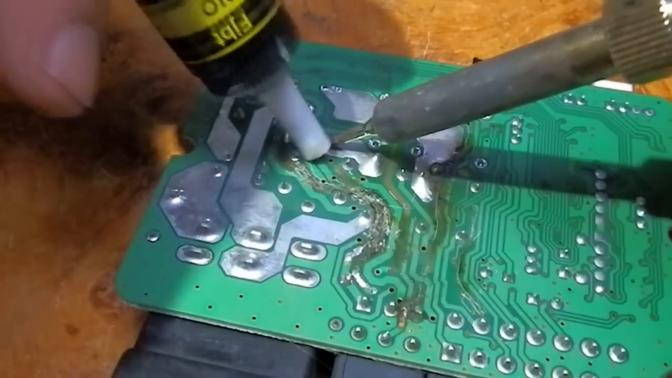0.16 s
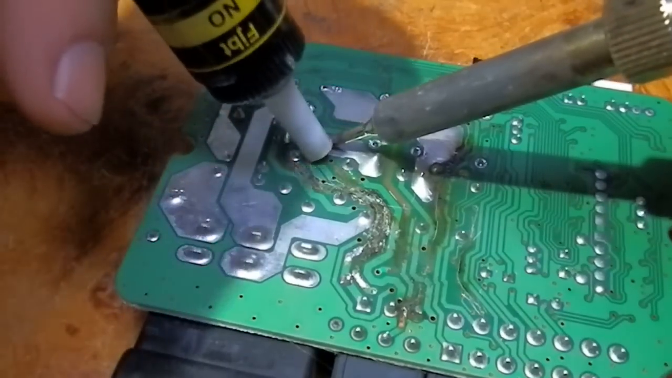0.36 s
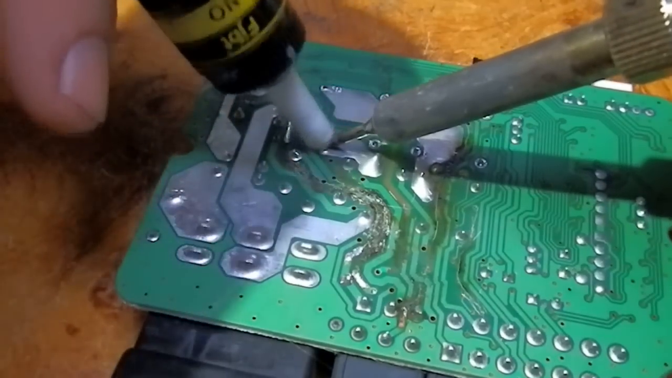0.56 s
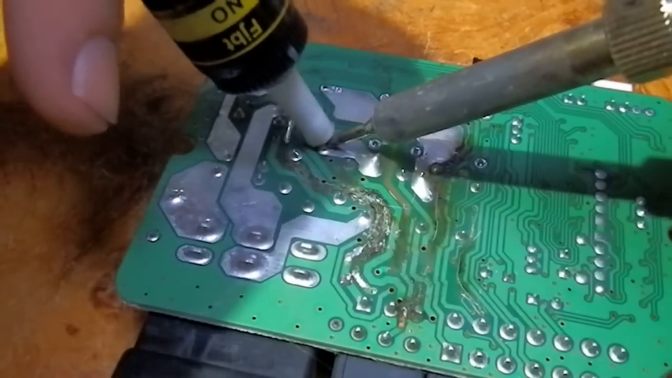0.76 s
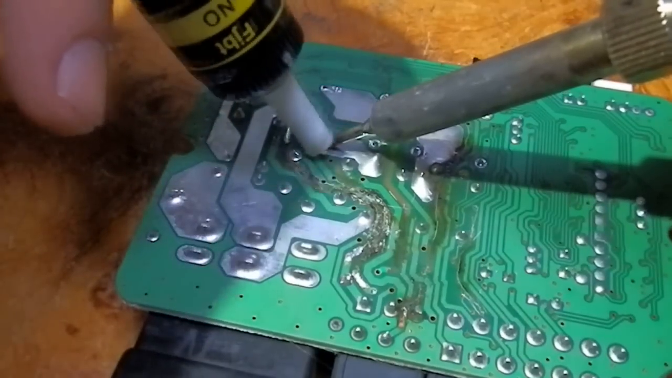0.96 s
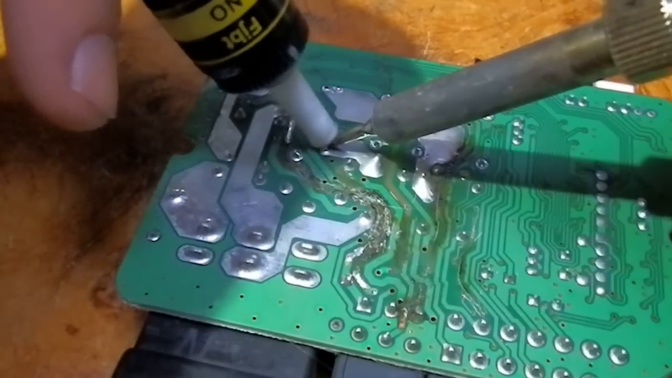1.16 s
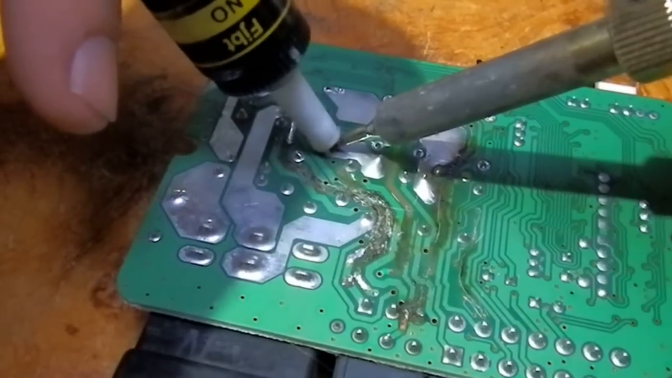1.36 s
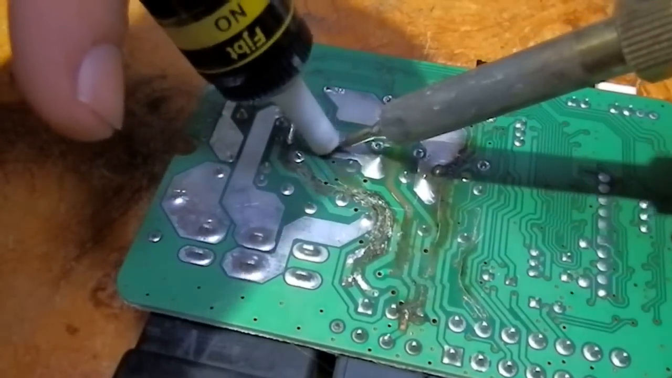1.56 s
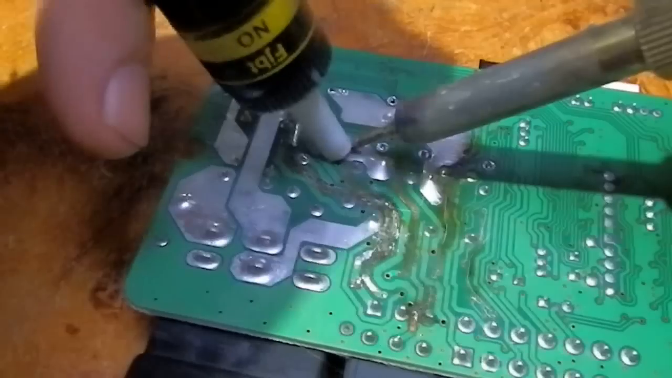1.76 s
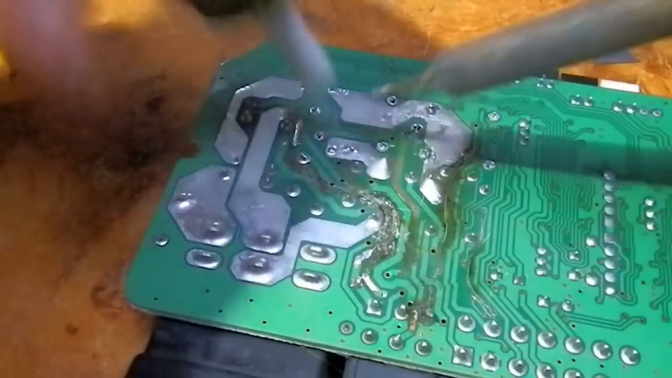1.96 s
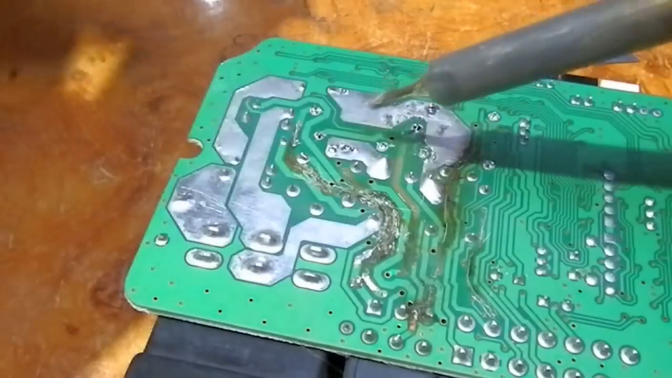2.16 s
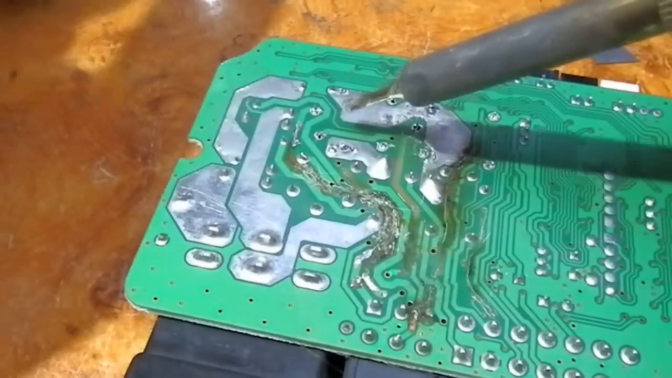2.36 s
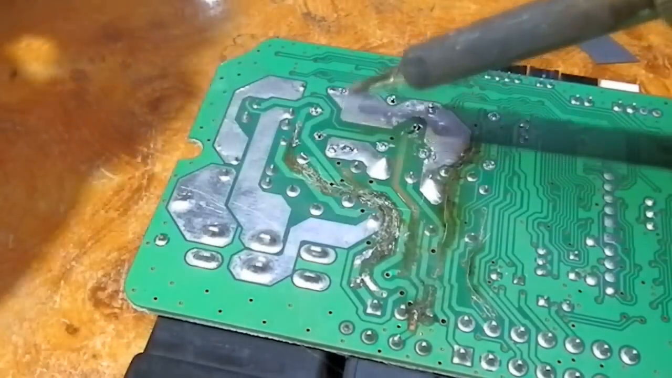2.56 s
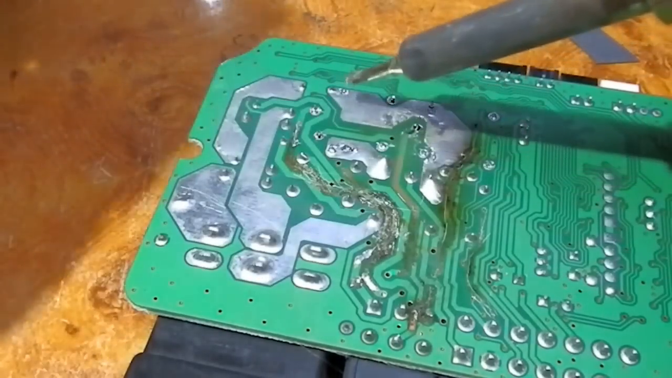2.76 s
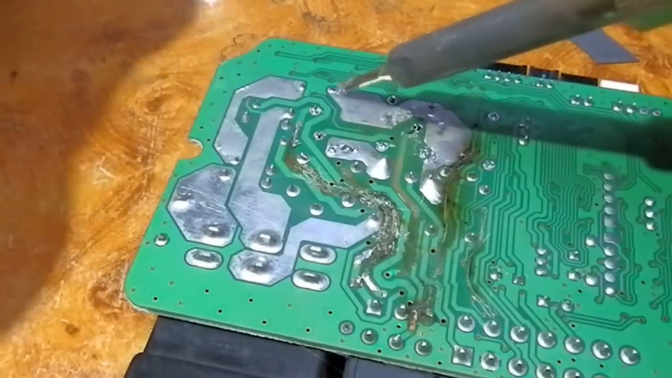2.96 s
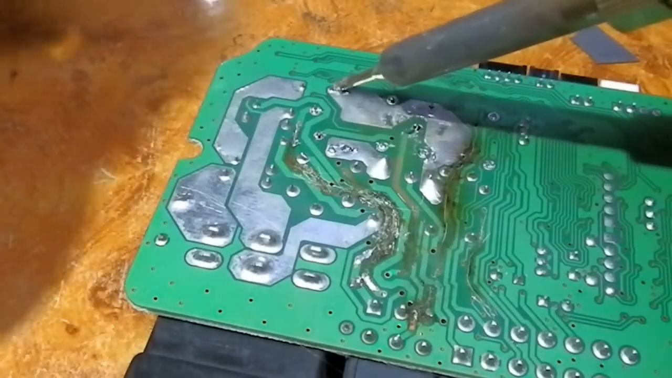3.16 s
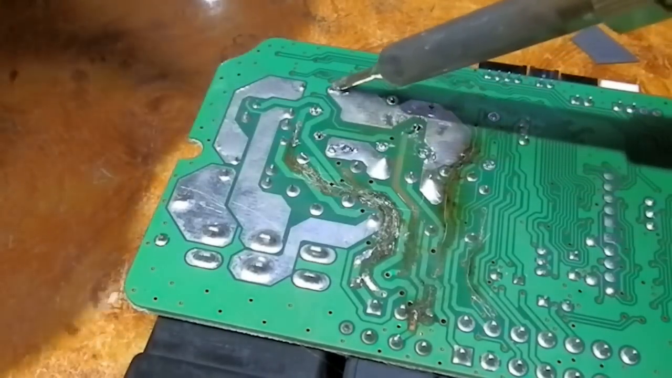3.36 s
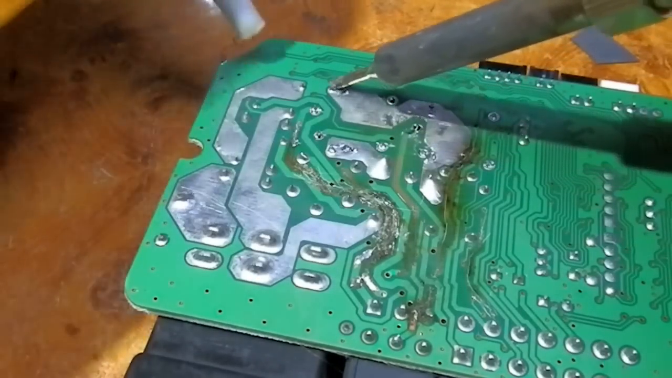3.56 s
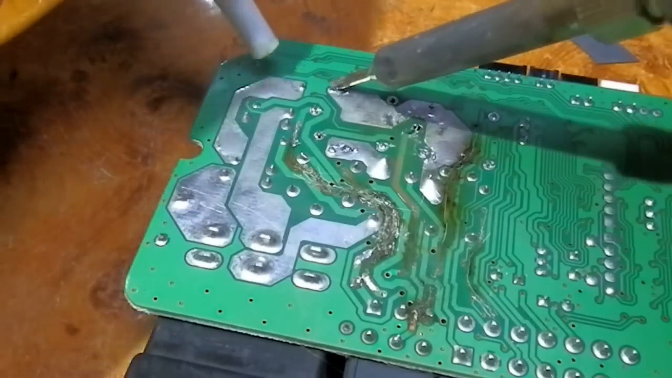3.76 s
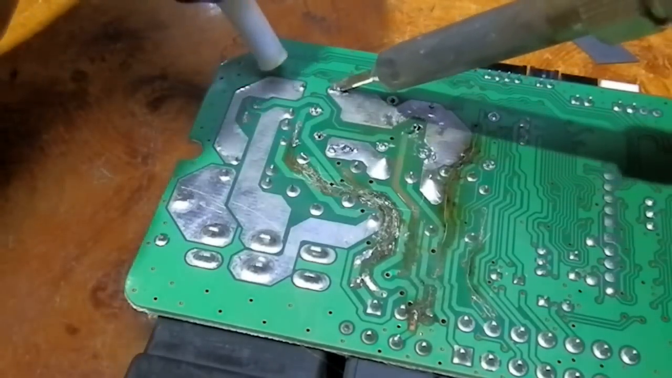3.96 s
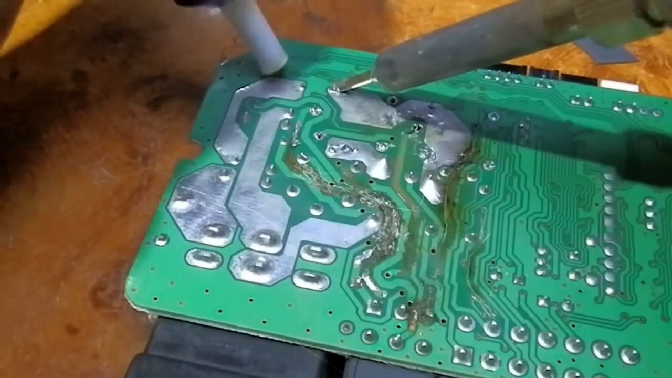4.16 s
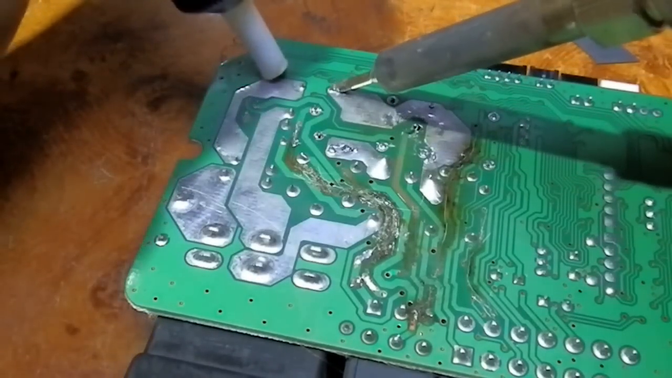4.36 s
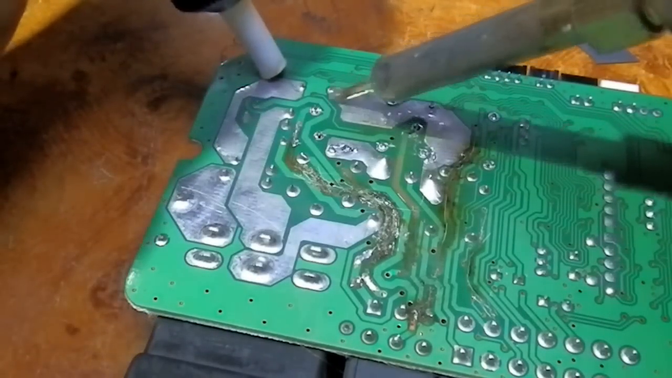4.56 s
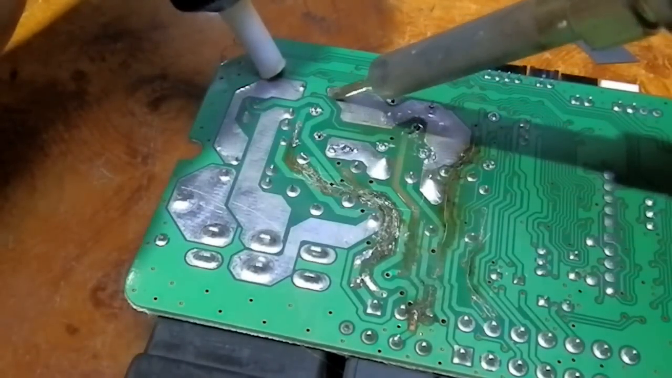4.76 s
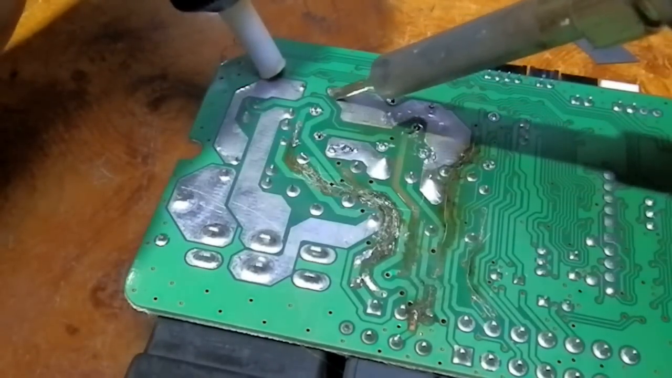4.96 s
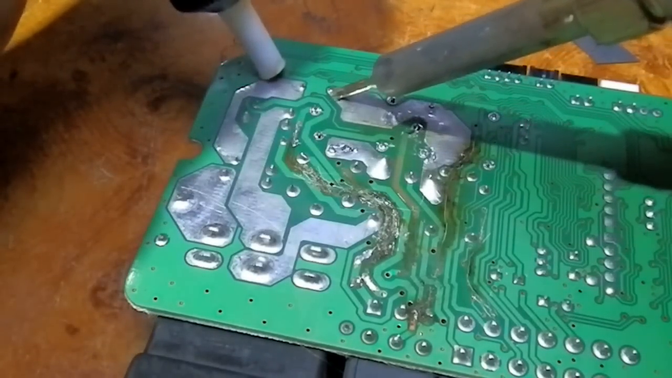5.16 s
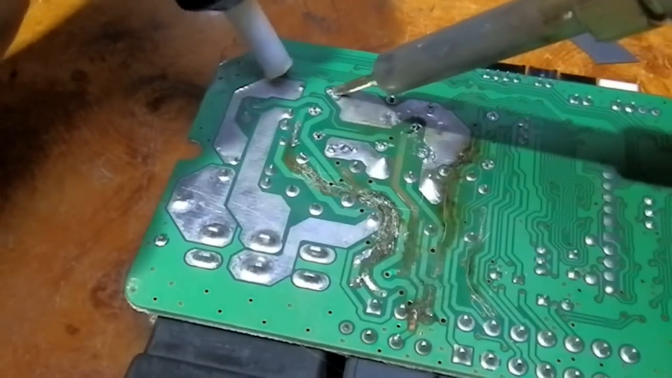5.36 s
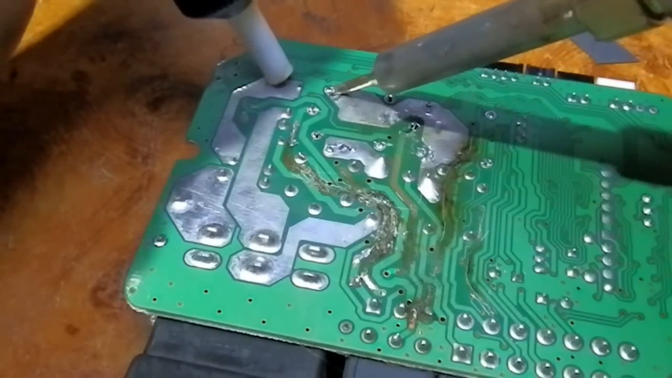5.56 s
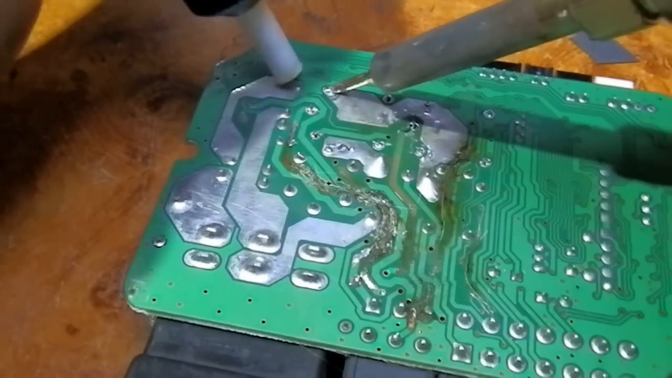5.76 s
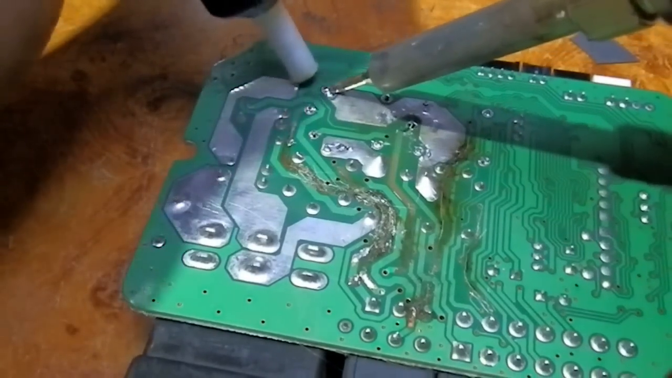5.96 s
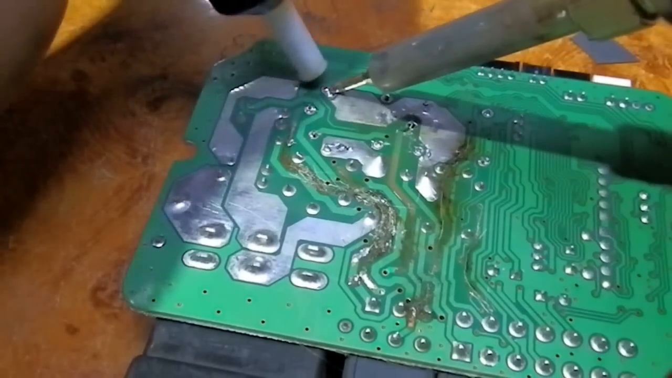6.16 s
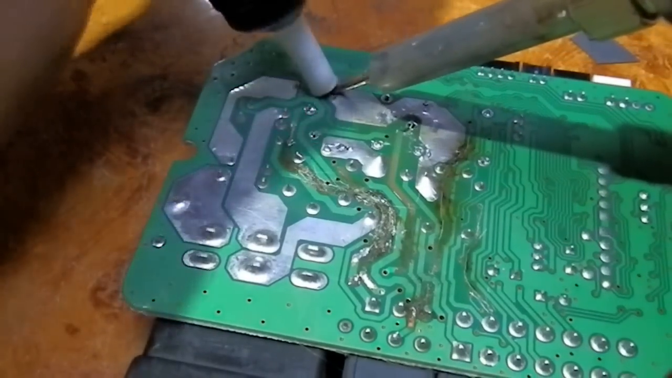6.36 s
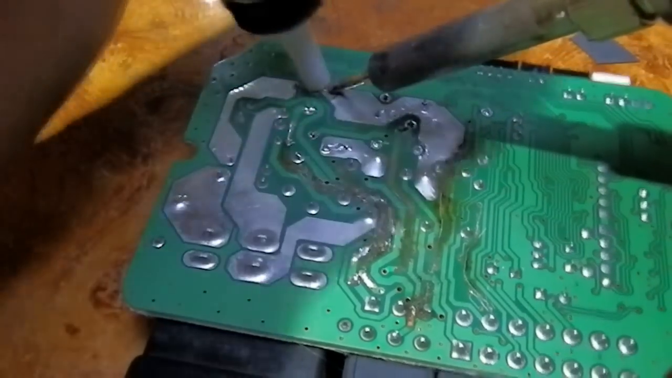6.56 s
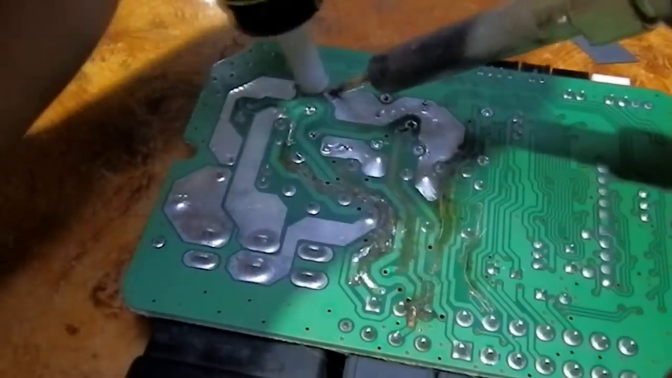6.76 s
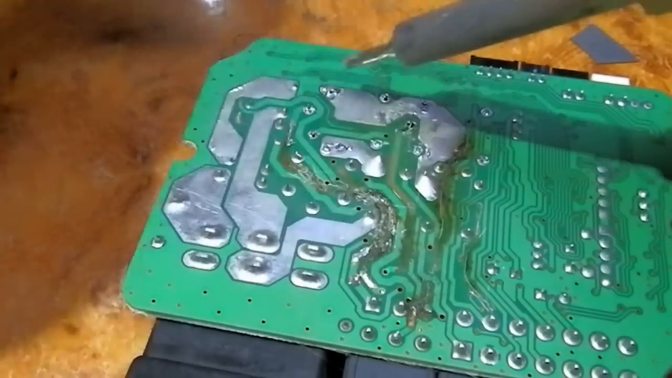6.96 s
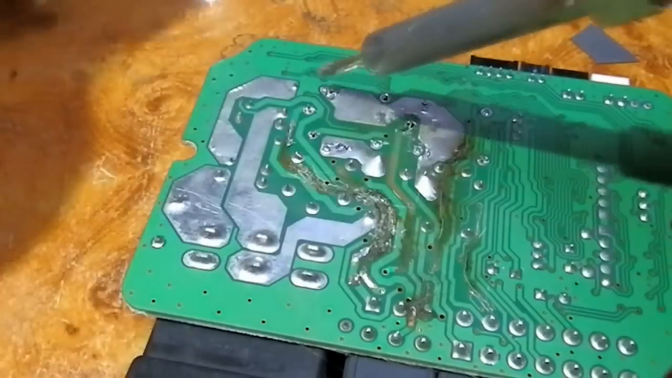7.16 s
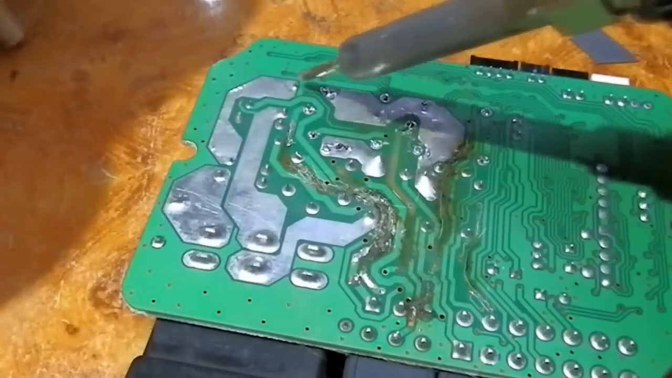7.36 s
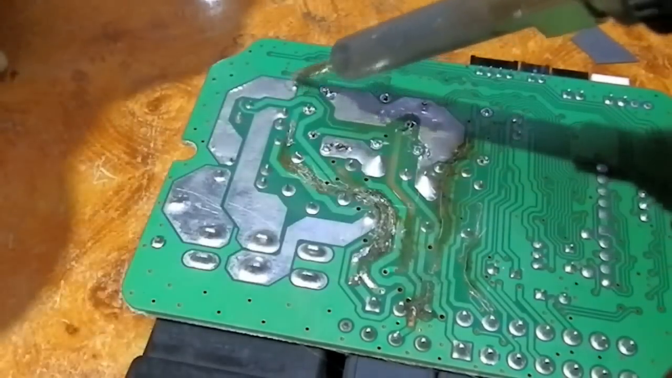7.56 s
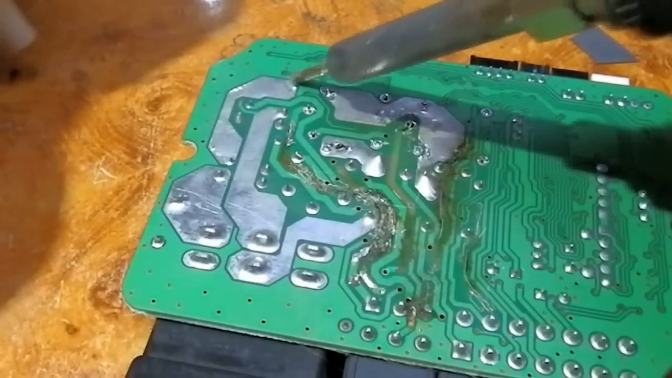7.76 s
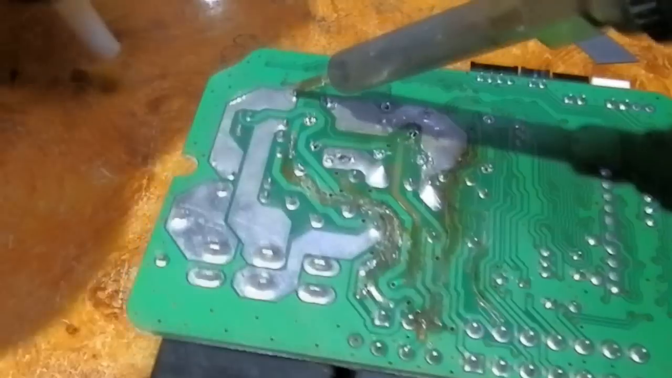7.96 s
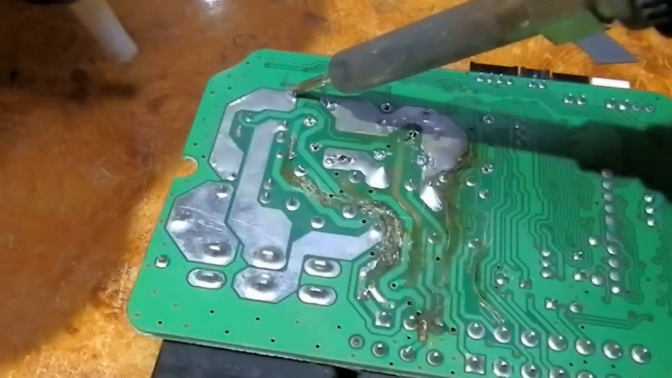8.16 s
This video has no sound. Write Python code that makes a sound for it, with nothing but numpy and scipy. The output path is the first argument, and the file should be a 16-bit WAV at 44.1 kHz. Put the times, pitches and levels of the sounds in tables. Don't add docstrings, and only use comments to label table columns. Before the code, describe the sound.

At a workbench, close to a small microphone, light taps touch a circuit board over fan hum and thin electronic whine. A spring-loaded pump fires with a very loud plastic crack and rush of air; a second later it scrapes, latches and clacks back with a faint spring ring. After a quiet gap the cycle repeats. Background sound drops after each snap and swells back.

```python
import sys
import numpy as np
from scipy import signal
from scipy.fft import rfft, irfft, next_fast_len
from scipy.io import wavfile
from scipy.ndimage import uniform_filter1d, map_coordinates

SR = 44100
rng = np.random.default_rng(int(sys.argv[2]) if len(sys.argv) > 2 else 0)


def unload_audio(sound):
    columns = np.transpose(np.atleast_2d(sound))
    steps = np.round(np.clip(columns, -1, 1) * 32767)
    wavfile.write(sys.argv[1], SR, steps.astype(np.int16))


def attenuation_scalar(level_db):
    decades = np.asarray(level_db, float) / 20
    return 10 ** decades


N = 362061


def along(points, hz):
    f, v = np.transpose(points)
    return np.interp(np.log(hz + 1), np.log(f + 1), v)


def unit(x):
    return x / np.sqrt(np.mean(x ** 2) + 1e-20)


def filtered(x, response):
    m = next_fast_len(len(x) + 4096)
    return irfft(rfft(x, m) * response(np.fft.rfftfreq(m, 1 / SR)), m)[:len(x)]


def peak(f, hz, width_hz):
    return 1j * f * width_hz / (hz * hz - f * f + 1j * f * width_hz)


def modes(table):
    return lambda f: sum((-1) ** k * attenuation_scalar(db) * peak(f, hz, w) for k, (hz, w, db) in enumerate(table))


def noise(spectrum, size):
    return unit(filtered(rng.standard_normal(size), lambda f: attenuation_scalar(along(spectrum, f))))


def wobble(rate):
    return map_coordinates(rng.standard_normal(int(N * rate / SR) + 4), [np.arange(N) * rate / SR])


def add(track, s, sound):
    part = track[round(s * SR):][:len(sound)]
    part += sound[:len(part)]


# frequency in Hz, level in dB rms.
HUM_LINES = [(118.4, -55), (150.7, -41.5), (199.2, -49), (220.7, -50), (274.5, -40), (425.3, -56.5),
             (602.9, -52.5), (1104, -58), (1701, -61.5)]
# centre in Hz, width in Hz, level in dB rms.
WHINES = [(4183, 80, -71), (4550, 170, -64), (5330, 200, -64), (7200, 300, -58), (8420, 100, -69)]
# frequency in Hz, level in dB rms.
SCREEN_LINES = [(15734.5, -59), (15747.2, -63)]
# frequency in Hz, level in dB per Hz.
ROOM_AIR = [(15, -39), (40, -9.5), (120, -12), (300, -6.5), (450, -14), (620, -9.5), (1000, -17),
            (1500, -20.5), (3000, -27), (6000, -32), (7300, -29.5), (8500, -33), (12000, -41.5),
            (16500, -43.5)]


def workshop():
    t = np.arange(N) / SR

    def line(hz, db):
        return attenuation_scalar(db + 3.5) * np.sin(2 * np.pi * (hz * t + rng.random()))

    def whistle(hz, width_hz, db):
        hiss = filtered(rng.standard_normal(N), lambda f: peak(f, hz, width_hz) ** 2)
        return attenuation_scalar(db) * unit(hiss)

    hum = sum(line(hz, db + 0.81 * wobble(6)) for hz, db in HUM_LINES)
    whine = sum(whistle(*row) for row in WHINES)
    screen = sum(line(hz, db + 1.0 * wobble(12)) for hz, db in SCREEN_LINES)
    air = attenuation_scalar(-37.5 + 0.46 * wobble(5)) * noise(ROOM_AIR, N)
    return hum + whine + screen + air


# time in seconds, gain it falls to in dB.
GAIN_DUCKS = [
    (1.695, -29),
    (2.82, -26),
    (3.015, -23.5),
    (6.55, -33),
    (7.525, -23.5),
    (7.685, -21.5),
]
DUCK_S, RECOVER_DB_PER_S = .03, 17.5


def camera_gain():
    gain_db, t = np.zeros(N), np.arange(N) / SR
    for s, low_db in GAIN_DUCKS:
        k = round(s * SR)
        since = t[k:] - s
        fall = np.exp(-since / DUCK_S)
        gain_db[k:] = np.minimum(0, low_db + (gain_db[k] - low_db) * fall + RECOVER_DB_PER_S * since)
    return gain_db


TREBLE_HZ, TREBLE_DUCK = 1500, 1.035


def ducked_room():
    room, gain_db = workshop(), camera_gain()
    bass = filtered(room, lambda f: 1 / (1 + (f / TREBLE_HZ) ** 2))
    return attenuation_scalar(gain_db) * bass + attenuation_scalar(TREBLE_DUCK * gain_db) * (room - bass)


# time in seconds, strength in dB.
COCK_EVENTS = [
    (2.8072, 0),
    (7.4935, -1.1),
]
STOP_EVENTS = [
    (3.019, -1),
    (7.688, 1.2),
]
# start and length in seconds, level in dB, centre in Hz.
WIDE_SIZZLES = [(0.466, .03, -41, 7340), (1.11, .02, -44.5, 7420), (2.167, 0.036, -52.5, 7240),
                (2.483, 0.097, -55.5, 9030), (3.136, .021, -65.5, 11020), (4.54, .05, -45.5, 11260),
                (5.203, 0.043, -43, 10840), (5.527, .063, -51.5, 10920), (6.279, 0.013, -30, 420),
                (6.283, 0.045, -46, 7840), (6.765, .035, -68, 7430), (7.1, 0.18, -75.5, 9480),
                (7.77, 0.083, -59.5, 5050), (7.931, 0.047, -66.5, 10000)]
# start and length in seconds, level in dB, centre in Hz.
FLUX_CHIRPS = [
    (2.488, 0.062, -55, 6400),
    (3.079, .025, -58, 4820),
    (4.546, .03, -49, 6820),
    (4.61, .03, -60, 15700),
]
# delay and length in seconds, level in dB, centre in Hz, width in Hz.
LATCH_AIR = [
    (.001, 0.021, -26.5, 7200, 7000),
    (.036, .032, -36, 5890, 7900),
    (.037, .06, -47.5, 3400, 1200),
]
STOP_AIR = [
    (.006, .085, -53.5, 7930, 9010),
]


def sizzles():
    rows = [(*row, row[-1] * 0.42) for row in WIDE_SIZZLES]
    rows += [(*row, row[-1] * 0.06) for row in FLUX_CHIRPS]
    for events, puffs in ((COCK_EVENTS, LATCH_AIR), (STOP_EVENTS, STOP_AIR)):
        for s, more_db in events:
            rows += [(s + delay, length, db + more_db, *band) for delay, length, db, *band in puffs]
    out = np.zeros(N)
    for s, length, db, hz, width_hz in rows:
        u = np.linspace(0, 1, round(length * SR))
        hiss = filtered(rng.standard_normal(SR // 4), lambda f: peak(f, hz, width_hz) ** 2)
        hiss = unit(hiss)[999:]
        add(out, s, attenuation_scalar(db) * np.sin(np.pi * u ** 0.39) * hiss[:len(u)])
    return out


# start and end in seconds, start and end in Hz, level in dB.
SINGING = [
    (2.757, 2.797, 5600, 6350, -32),
    (4.1, 4.2, 3400, 3520, -53),
    (4.2, 4.3, 3050, 2800, -54),
]


def squeak():
    out = np.zeros(N)
    for start, end, start_hz, end_hz, db in SINGING:
        u = np.linspace(0, 1, round((end - start) * SR))
        hz = start_hz + (end_hz - start_hz) * u + 45 * wobble(120)[:len(u)]
        swell = np.sqrt(np.abs(np.sin(np.pi * u)))
        add(out, start, attenuation_scalar(db) * swell * np.sin(2 * np.pi * np.cumsum(hz) / SR))
    return out


# time in seconds, level in dB.
PLUNGER_SLIDES = [
    [(2.66, -71.5), (2.718, -48), (2.76, -36.5), (2.795, -35)],
    [(7.37, -69), (7.418, -46.5), (7.462, -48.5), (7.478, -41.5)],
]
# frequency in Hz, level in dB per Hz.
SEAL_RUB = [(590, -45.5), (1000, -16.5), (1550, -17), (2670, -10), (4100, -17), (5850, -4.5),
            (15600, -24.5), (16200, -21.5), (17000, -91)]


def slides():
    t = np.arange(N) / SR
    level = 0
    for rows in PLUNGER_SLIDES:
        last_s, last_db = rows[-1]
        points = np.transpose(rows + [(last_s + 0.029, last_db - 5)])
        level = level + attenuation_scalar(np.interp(t, *points, left=-120, right=-120))
    return level * unit(attenuation_scalar(2 * wobble(300)) * noise(SEAL_RUB, N))


# frequency in Hz, level in dB, t60 in seconds.
RECOIL = [(407, 0.5, .02), (159, -10.5, 0.054)]


def strokes(rows, spectrum):
    out, t = np.zeros(N), np.arange(SR // 10) / SR
    for start, end, start_db, end_db, thump_db in rows:
        flight = end - start
        level_db = np.interp(t, [0, flight, flight + 0.0048, end + 0.035 - start],
                             [start_db, end_db, end_db - 19.5, end_db - 53.5])
        chatter = attenuation_scalar(5.8 * unit(uniform_filter1d(rng.standard_normal(len(t)), 40)))
        rush = unit(chatter * noise(spectrum, len(t)))
        add(out, start, attenuation_scalar(level_db) * np.clip(t / .001, 0, 1) * rush)
        thump = sum(attenuation_scalar(thump_db + db - 60 * t / t60) * np.sin(2 * np.pi * hz * t) for hz, db, t60 in RECOIL)
        add(out, start + 0.00043, thump)
    return out


# start and end in seconds, start and end level in dB, thump in dB.
AIR_STROKES = [
    (1.6885, 1.704, -16, -11, -11.5),
    (6.5405, 6.5565, -13, -14, -8.5),
]
REBOUND_STROKES = [
    (3.011, 3.021, -28, -21, -51.5),
    (7.6765, 7.6885, -30.5, -19.5, -70),
]
# frequency in Hz, level in dB per Hz.
AIR_RUSH = [(88, -31.5), (150, -10.5), (900, -10.5), (1300, -7), (2000, -7.5), (2900, -19), (5700, 1),
            (8500, 4), (11200, -5.5), (15100, -10), (17000, -23.5)]
REBOUND_CHATTER = [(800, -62), (1800, -25), (3300, 5.5), (5000, -5.5), (6500, -7.5), (8500, -2),
                   (11000, -18), (16000, -28.5)]


def plunger_flights():
    return strokes(AIR_STROKES, AIR_RUSH) + strokes(REBOUND_STROKES, REBOUND_CHATTER)


# time in seconds, strength in dB.
SHOT_EVENTS = [
    (1.6885, -0.11),
    (6.5410, -0.92),
]
# start in seconds, frequency in Hz, level in dB, rise and t60 in
# seconds.
RINGING_TONES = [(2.84, 2480, -39, .003, .12), (6.49, 2514, -31, .003, .12), (6.49, 3811, -39, .003, .2),
                 (6.542, 4600, -3, .0008, .02), (6.556, 3811, -44, .003, .13), (1.704, 2000, -34, .002, .09),
                 (1.704, 1500, -36, .002, .09), (7.524, 3450, -14, .0008, .03),
                 (6.799, 3720, -52, .001, .08), (7.70, 2866, -51, .005, .25), (7.699, 2406, -47, .005, .16),
                 (3.1, 6170, -70, .02, 1),
                 (3.025, 2400, -31, .025, .19),
    (3.025, 2400, -51, .03, 1),
    (3.088, 2250, -58, .07, 3),
    (3.088, 2233.5, -67, .05, 1.8),
    (7.767, 2256, -57, .05, 9),
    (7.767, 2233.5, -54, .05, 1.3),
]
# delay in seconds, frequency in Hz, level in dB, rise and t60 in seconds.
ROD_TONES = [(.0005, 685, -28.5, 0.00092, 0.029), (.0005, 434, -32, 0.00066, 0.025),
             (.003, 3450, -54, .002, .12), (.003, 7208, -60, .002, .17), (.003, 9185, -52.5, .002, 0.24),
             (.003, 9641, -48, .002, .14), (.003, 12000, -55, .002, .15)]
CAP_TONES = [(.013, 1990, -12, .0005, 0.017)]


def rings():
    out, t = np.zeros(N), np.arange(SR * 3 // 5) / SR
    fade = np.clip((t[-1] - t) / .15, 0, 1)
    struck = []
    for events, part in ((STOP_EVENTS, ROD_TONES), (SHOT_EVENTS, CAP_TONES)):
        for s, more_db in events:
            struck += [(s + delay, hz, db + more_db, *rest) for delay, hz, db, *rest in part]
    for s, hz, db, rise, t60 in RINGING_TONES + struck:
        level = attenuation_scalar(db - 60 * t / t60) * (1 - np.exp(-t / rise)) * fade
        add(out, s, level * np.sin(2 * np.pi * hz * t))
    return out


# frequency in Hz, width in Hz, level in dB.
BENCH_MODES = [(420, 230, -3.5), (790, 600, 4), (1140, 330, 5), (2000, 1100, -5.5)]


def contacts(rows, body, focus):
    out, t = np.zeros(N), np.arange(SR // 16) / SR
    knock = filtered(np.exp(-t / 0.00018), modes(BENCH_MODES))
    knock /= np.abs(knock).max()
    for s, db, hz, knock_db, t60, bright_db in rows:
        burst = rng.standard_normal(len(t)) * attenuation_scalar(-60 * t / max(t60, .003)) * (1 - np.exp(-t / 0.00011))
        burst[8] += 3.5

        def tilt(f):
            return (1 + 1j * f / 6000) ** (bright_db / 4) * (f / (f + 1700 / 1j)) ** 4

        def colour(f):
            return (modes(body)(f) + focus * peak(f, hz, hz / 5)) * tilt(f + 1)

        crack = filtered(burst, colour)
        add(out, s, attenuation_scalar(db) * (crack / np.abs(crack).max() + attenuation_scalar(knock_db) * knock))
    return out


# time in seconds, peak in dB, colour in Hz.
BOARD_TAPS = [(0.9455, -26.5, 4260), (1.0703, -30.5, 4330), (2.171, -46, 7600), (2.382, -42.5, 7280),
              (2.693, -39.5, 7370), (2.754, -28.5, 5700), (2.9802, -49, 3970), (3.06, -43, 9070),
              (4.6594, -22, 7250), (6.7097, -55.5, 3520), (6.7216, -43, 5100), (6.797, -40.5, 3700),
              (7.3025, -49, 3820), (7.3794, -48, 6960), (7.3942, -46.5, 7930), (7.429, -41, 5820),
              (7.482, -31.5, 8900), (7.765, -44, 5000)]
# time in seconds, peak in
# dB, colour in Hz.
BOARD_NUDGES = [
    (0.171, -20.5, 7900),
    (1.5286, -19, 8610),
    (1.6305, -20, 4140),
    (1.637, -19, 4300),
]
# bench knock in dB, t60 in seconds, brightness in dB.
TAP_TONE = (-7.5, 0.023, 0.5)
NUDGE_TONE = (-2.5, .014, -7)
# frequency in Hz, width in Hz, level in dB.
BOARD_MODES = [(2300, 810, -2), (4350, 720, 3.5), (7860, 1200, 0), (12100, 8600, -13.5)]


def board_taps():
    rows = [(*row, *TAP_TONE) for row in BOARD_TAPS] + [(*row, *NUDGE_TONE) for row in BOARD_NUDGES]
    return contacts(rows, BOARD_MODES, focus=0.55)


def chain(pattern, events, bright_db):
    return [(s + delay, db + more_db, *rest, bright_db) for s, more_db in events for delay, db, *rest in pattern]


# time in seconds, strength in dB.
PRESS_EVENTS = [
    (6.4854, 0),
]
# delay in seconds, peak in dB, colour in Hz, bench knock in dB, t60 in seconds.
BUTTON_CONTACTS = [(0, -11.5, 2570, -4, .012), (.0023, -1.5, 6120, -16.5, 0.0052),
                   (.0051, -14.5, 4500, .5, .04)]
FIRE_CONTACTS = [(0, -2, 5110, -7, 0.017), (.003, -1.5, 8960, -22.5, .018), (.0065, -4, 8500, -31, .02),
                 (.0123, 2, 7100, -21, 0.0087), (.0132, -4.5, 2000, -15.5, .015),
                 (.023, -20.5, 5910, -13.5, 0.013)]
LATCH_CONTACTS = [(0, -2, 8210, -35, 0.015), (.006, -8.5, 5714, -24, .012), (.012, -16, 7790, -30, .012),
                  (.019, -15.5, 5440, -17.5, 0.031), (.0308, 5, 9550, -30.5, .007),
                  (.0319, -7, 3650, -25, .012), (.036, -14.5, 3700, -37, 0.011)]
STOP_CONTACTS = [(0, -7.5, 8560, -19.5, .01), (.001, -10, 3116, -20.5, 0.013),
                 (.0038, -23, 3030, -17.5, .02)]
# time in seconds, peak in dB, colour in Hz.
PLUNGER_RATTLE = [(3.0022, -29.5, 5055), (3.0094, -19, 4120), (3.0136, -17, 3410), (7.6688, -8, 5156),
                  (7.673, -14, 8990), (7.6757, -10, 3980), (7.6792, -13.5, 3726), (7.683, -14.5, 3950),
                  (7.6853, -9.5, 8780)]
# bench knock in dB, t60 in seconds, brightness in dB.
RATTLE_TONE = (-44, .011, 0.5)
# frequency in Hz, width in Hz, level in dB.
BARREL_MODES = [(3600, 3900, 0.5), (5600, 2500, 3), (8160, 4500, -10), (13200, 2000, -25)]


def pump_snaps():
    rows = chain(BUTTON_CONTACTS, PRESS_EVENTS, bright_db=-12.5)
    rows += chain(FIRE_CONTACTS, SHOT_EVENTS, bright_db=-2.1)
    rows += chain(LATCH_CONTACTS, COCK_EVENTS, bright_db=-3)
    rows += chain(STOP_CONTACTS, STOP_EVENTS, bright_db=-4)
    rows += [(*row, *RATTLE_TONE) for row in PLUNGER_RATTLE]
    return contacts(rows, BARREL_MODES, focus=2.1)


# frequency in Hz, t60 in seconds.
WALL_DECAY = [(300, 0.17), (2000, 0.14), (8000, 0.11), (16000, 0.058)]


def walls(x):
    hz, t, z = signal.stft(rng.standard_normal(SR // 4), SR, nperseg=256)
    decay = attenuation_scalar(-60 * t / along(WALL_DECAY, hz)[:, None])
    tail = signal.istft(z * decay, SR, nperseg=256)[1]
    late = np.pad(x, (130, 0))
    return signal.fftconvolve(late, tail / np.linalg.norm(tail))[:N]


def scene():
    pump = pump_snaps() + board_taps() + plunger_flights() + slides()
    return (pump + attenuation_scalar(-20) * walls(pump) + sizzles() + squeak() + rings() + ducked_room())[None]


def audible(x, floor_db):
    hz, _, z = signal.stft(x, SR, nperseg=2048)
    band = uniform_filter1d(np.abs(z) ** 2, size=16, axis=0)
    keep = (band > attenuation_scalar(floor_db) ** 2) | (hz < 4000)[:, None]
    return signal.istft(z * keep, SR, nperseg=2048)[1][:N]


def band_limit(x):
    return signal.sosfilt(signal.butter(12, 17140, fs=SR, output="sos"), x)


def record(dry):
    clipped = dry[0] / (1 + np.abs(dry[0] / .69) ** 8) ** (1 / 8)
    band = filtered(clipped, lambda f: np.where(f < 15860, 1, attenuation_scalar(-22) * (f < 16600)))
    return band_limit(audible(band, floor_db=-104)[None])


dry = scene()
out = record(dry)
unload_audio(out)
```